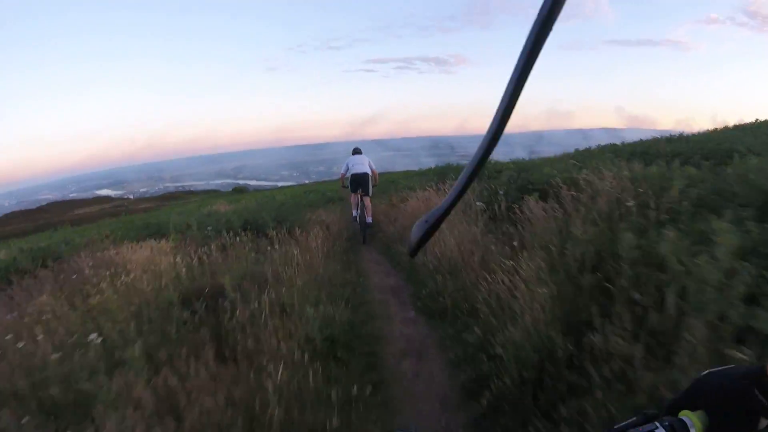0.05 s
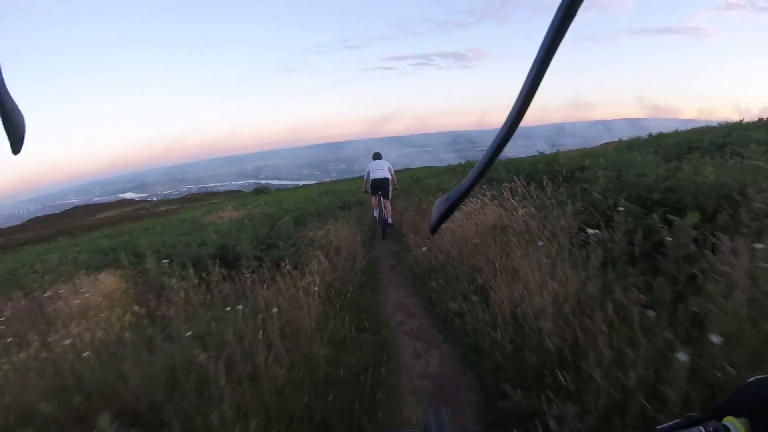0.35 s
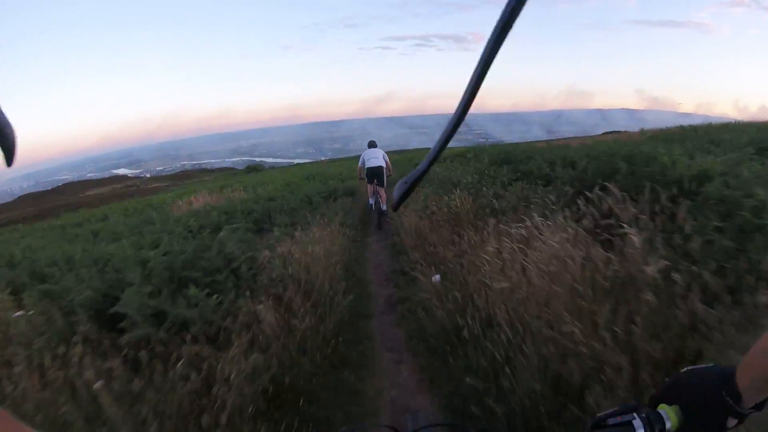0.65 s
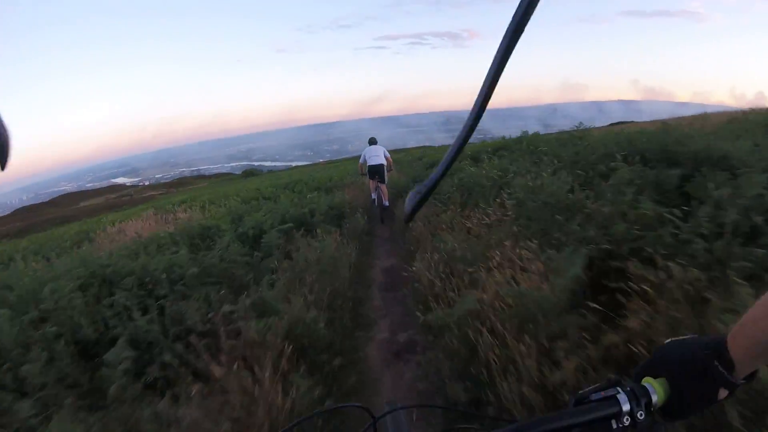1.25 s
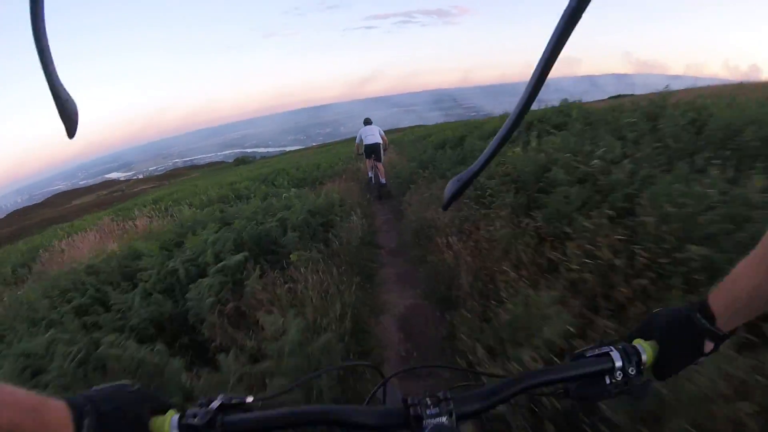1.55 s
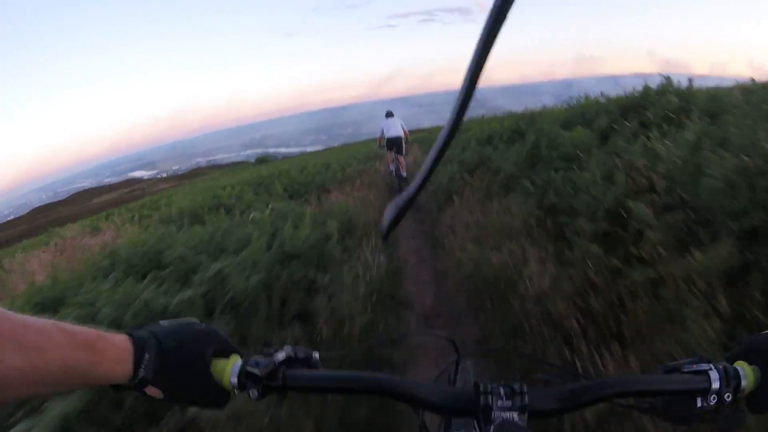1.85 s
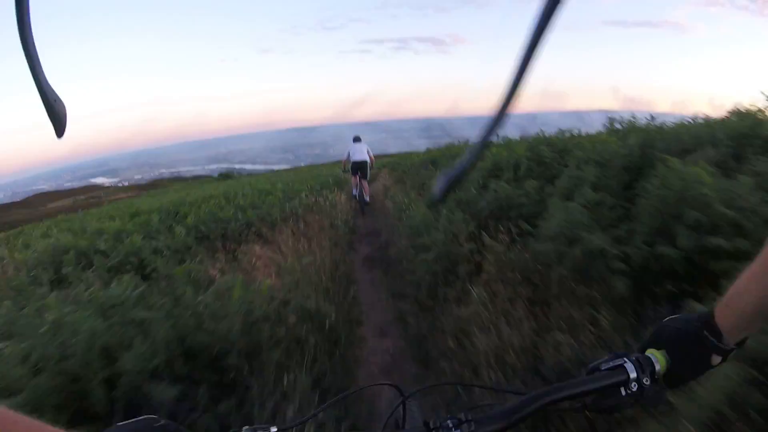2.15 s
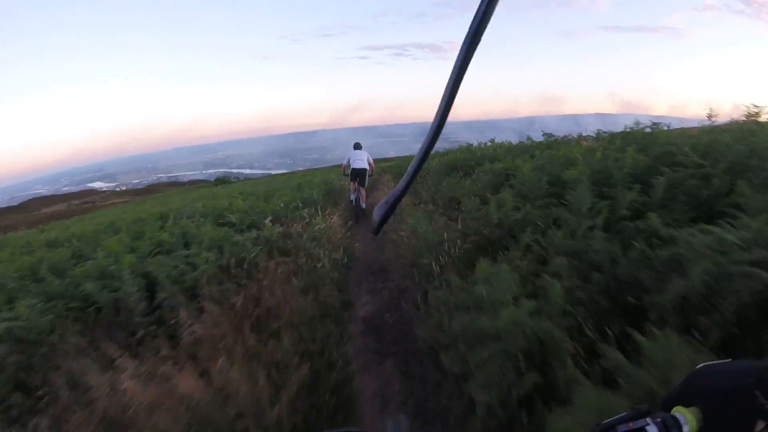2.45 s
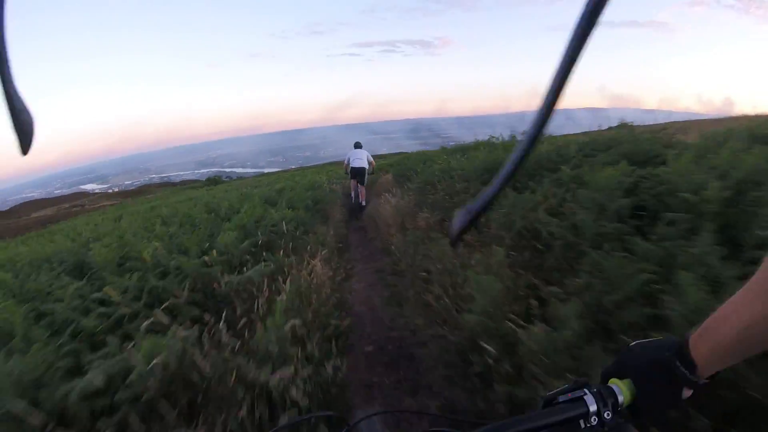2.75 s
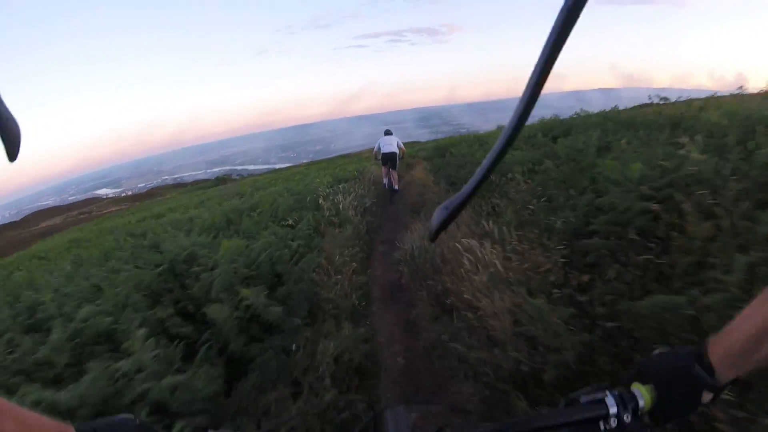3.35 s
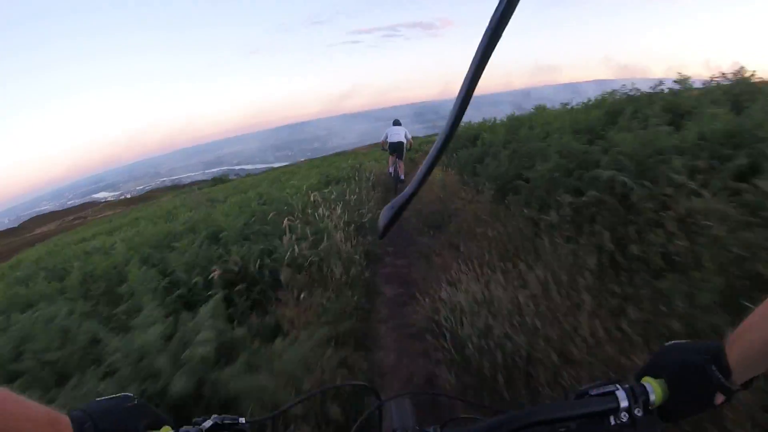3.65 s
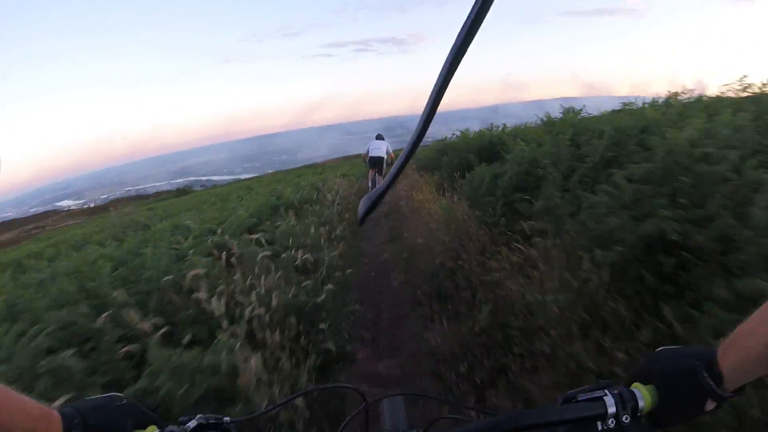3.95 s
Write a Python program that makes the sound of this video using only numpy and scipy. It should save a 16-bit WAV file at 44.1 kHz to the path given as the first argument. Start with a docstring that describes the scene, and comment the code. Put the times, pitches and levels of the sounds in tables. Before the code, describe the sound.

Gusts of wind buffet a microphone carried on a moving mountain bike. The chain rattles against the frame, most clearly just past halfway, while long grass brushes faintly by and the tyres crunch quietly on a dirt path.

```python
"""A dirt trail through long grass and bracken, heard from the rider of a rolling mountain bike.
Wind leads: gusts rumble on the microphone, and hard eddies thump and tear at its port.
Over bumps the chain knocks and rattles on the frame, ringing its modes, with one metallic clack.
Stems swish against the bike, a stiff one squeaks past, and the tyres crunch softly underneath."""
import sys
import numpy as np
from scipy import signal
from scipy.fft import rfft, irfft
from scipy.io import wavfile
from scipy.ndimage import uniform_filter1d

SR = 44100
rng = np.random.default_rng(int(sys.argv[2]) if len(sys.argv) > 2 else 0)


def int16_out(signal):
    """Quantize to a 16-bit WAV file."""
    q = np.round(np.clip(np.atleast_2d(signal).T, -1, 1) * 32767)
    wavfile.write(sys.argv[1], SR, q.astype(np.int16))


N = 176400
TIME = np.arange(N) / SR

# Steady wind between gusts: time_s, level_db
WIND_BED = [(0, -28.5), (.2, -26), (.53, -36.5), (.68, -24), (1.3, -35), (1.55, -36.5), (1.7, -32.5),
            (1.88, -20), (2.15, -30.5), (2.45, -34), (3.1, -29), (3.35, -33), (3.65, -28), (4, -23.5)]
# Gusts breaking on the microphone: centre_s, length_s, rumble_db, turbulence_db
WIND_GUSTS = [(.01, 0.037, -17.5, -28.5), (0.097, 0.026, -21, -26), (0.388, 0.074, -19, -26.5),
              (0.743, 0.034, -22, -27), (0.841, 0.049, -33, -25), (0.988, 0.036, -27, -30),
              (1.052, 0.035, -18, -33), (1.118, 0.014, -40, -25.5), (1.268, 0.16, -24, -38),
              (1.737, 0.0098, -32, -26.5), (1.861, 0.013, -35, -15.5), (1.909, 0.032, -27, -27),
              (1.98, 0.04, -23.5, -24), (2.082, 0.044, -20, -26.5), (2.145, 0.021, -25.5, -19),
              (2.247, 0.054, -17.5, -30), (2.57, 0.029, -21, -26), (2.682, 0.068, -19.5, -30.5),
              (3.094, 0.074, -24, -32.5), (3.227, 0.018, -18.5, -32), (3.464, 0.084, -20, -33),
              (3.639, 0.1, -21.5, -29.5), (3.729, 0.034, -19, -23.5), (3.773, 0.015, -10.5, -14),
              (3.832, 0.014, -20, -23.5), (3.918, 0.03, -27, -24)]
# EQ of the wind's low end: frequency_hz, gain_db
RUMBLE_EQ = [(15, -33.5), (25, -3), (38, 0.5), (75, 4.5), (115, 0.5), (185, -7.5), (400, -30.5), (880, -72)]
# EQ of the churning air above it: frequency_hz, gain_db
TURBULENCE_EQ = [(60, -19), (130, -4.5), (205, -0.5), (340, -8), (500, -12.5), (800, -22), (1300, -34),
                 (4000, -71.5)]
# Hard eddies striking the microphone: centre_s, level_db, half_width_s
HARD_EDDIES = [(0.154, -24, 0.001), (.384, -15.5, .0011), (0.402, -14, 0.0025), (0.427, -14, 0.001),
               (0.515, -16.5, 0.0028), (0.736, -14, 0.0024), (0.823, -31, 0.00055), (1.809, -18.5, 0.0006),
               (1.981, -12, 0.0019), (1.99, -19.5, 0.00055), (2.071, -18.5, 0.00066), (2.207, -13.5, 0.002),
               (2.404, -20.5, 0.0015), (2.691, -20, 0.00065), (3.005, -15, 0.0022), (3.137, -14, 0.0031),
               (3.441, -17.5, 0.0022), (3.653, -18, 0.0013), (3.772, -7.5, 0.0017), (3.775, -21.5, 0.00052),
               (3.809, -22, 0.00053), (3.719, -28, 0.00053), (3.961, -16.5, 0.0014)]
# Chain hits on the frame: start_s, peak_db
CHAIN_HITS = [(0.2567, -38), (0.607, -36), (0.6404, -33), (0.7102, -36.5), (0.7862, -39.5), (0.957, -35.5),
              (1.0903, -38.5), (1.3914, -39), (1.4413, -42), (1.4708, -42), (1.752, -34), (1.7993, -36.5),
              (1.9112, -33.5), (1.926, -32), (2.0469, -40), (2.2298, -31), (2.2723, -22), (2.308, -31),
              (2.3437, -37), (2.38, -35.5), (2.4151, -33), (2.4508, -33.5), (2.4894, -37.5), (2.5455, -36),
              (2.6312, -39), (2.7376, -38), (2.881, -35.5), (2.8973, -36), (3.1053, -30.5), (3.2303, -33),
              (3.38, -41.5), (3.431, -35.5), (3.5796, -29), (3.6292, -27), (3.667, -30.5), (3.7883, -33),
              (3.8617, -35), (3.906, -36.5)]
# Resonances of the frame: pitch_hz, bandwidth_hz, gain_db
FRAME_MODES = [(1260, 220, 8.5), (2013, 620, 16.5), (2590, 620, 1.5)]
# Resonances of the metallic clack: pitch_hz, bandwidth_hz, gain_db
CLACK_MODES = [(1900, 150, 10), (2570, 270, 1), (3260, 330, 1), (5150, 760, -1.5), (7200, 800, -6.5)]
# Grass brushing the bike: time_s, level_db
BRUSH_BED = [(0, -51.5), (.58, -53.5), (.72, -45.5), (.95, -47), (1.05, -51), (1.7, -56), (1.9, -45.5),
             (2.15, -48.5), (2.42, -44.5), (2.55, -49), (2.8, -52), (2.95, -46), (3.5, -49), (3.63, -43),
             (4, -51)]
# Tufts and stems swiping the bike: centre_s, length_s, level_db
TUFT_SWIPES = [(0.631, 0.033, -57.5), (1.767, 0.035, -51), (1.807, 0.034, -49.5), (1.904, 0.0084, -49),
               (2.055, 0.012, -48.5), (2.235, 0.037, -51), (2.358, 0.011, -47), (2.434, 0.022, -42.5),
               (3.195, 0.0061, -45.5), (3.845, 0.0061, -46.5)]
# Bright EQ of the grass, also on the edge of each chain hit: frequency_hz, gain_db
SWISH_EQ = [(1500, 2.5), (3000, -5), (3900, -5.5), (4500, -2.5), (5100, 4), (5600, -3.5), (6250, -2.5),
            (6520, 8), (6800, 0.5), (7800, -5), (10500, -27.5), (14000, -50)]
# Rolling level, ridden by both tyre crunch and chain rattle: time_s, level_db
ROLL_BED = [(0, -55), (.55, -57.5), (.8, -52), (1.6, -55.5), (2.4, -48.5), (2.7, -54), (3.15, -50),
            (4, -52)]
# EQ of tyres on dirt: frequency_hz, gain_db
DIRT_EQ = [(600, 4.5), (1300, 0.5), (1850, -1.5), (2600, -2), (3200, -3), (3900, -14), (5000, -8.5),
           (9000, -16), (13000, -52.5)]

RUMBLE_DB, TURBULENCE_DB, SPIT_DB, TEAR_DB = 1, -2.5, -16.5, -16  # wind trims
KNOCK_DB, RATTLE_DB, BRUSH_DB, SWIPE_DB, TYRE_DB = -3.5, -6.5, -5, 5, 3.5  # bike and grass trims
FLUTTER_HZ, FLUTTER_WIDTH_HZ = 542, 550
KNOCK_BAND = signal.butter(3, [600, 3500], "band", fs=SR, output="sos")


def wind(eddies_per_s=160, eddy_db=-4, calm_turbulence_db=-11):
    """Air breaks on the microphone: a steady bed plus gusts, each with rumble and puffs of turbulence."""
    rumble_power = level(WIND_BED) ** 2
    churn_power = rumble_power * amp(calm_turbulence_db) ** 2
    for centre_s, length_s, rumble_db, turbulence_db in WIND_GUSTS:
        gust = swell(centre_s, length_s)
        rumble_power += (gust * amp(rumble_db)) ** 2
        churn_power += (gust * amp(turbulence_db)) ** 2
    puffs = steadied(wobble(depth_db=3, rate_hz=63), samples=2500)
    rumble = steadied(colour(rng.standard_normal(N), RUMBLE_EQ), samples=1500) * np.sqrt(puffs)
    rumble *= steadied(wobble(depth_db=2.5, rate_hz=19), samples=SR // 8)  # pushes with dips between
    eddies = sum(signal.fftconvolve(clicks(eddies_per_s / 3, spread_db=5.5), eddy(half_width_s), "same")
                 for half_width_s in (.0008, .0012, .002))
    rush = unit(colour(rng.standard_normal(N), TURBULENCE_EQ))
    churn = steadied(rush + amp(eddy_db) * unit(eddies), samples=1500)
    force = np.sqrt(churn_power) * puffs
    spit = force * unit(force) ** -0.06 * port_flutter(FLUTTER_HZ)  # follows the force, lightly compressed
    return (amp(RUMBLE_DB) * np.sqrt(rumble_power) * rumble
            + amp(TURBULENCE_DB) * force * churn + amp(SPIT_DB) * spit)


def buffets(reference_half_width_s=.0008, reference_hz=580):
    """Each hard eddy lands a dull thump and tears at the port; tighter ones tear louder and higher."""
    out = np.zeros(N)
    for centre_s, level_db, half_width_s in HARD_EDDIES:
        thump = eddy(half_width_s)
        add(out, centre_s - len(thump) / 2 / SR, -amp(level_db) * thump)
        tightness = reference_half_width_s / half_width_s
        tear = swell(centre_s, length_s=0.005) * port_flutter(reference_hz * tightness)
        out += amp(level_db + TEAR_DB) * tightness ** 2 * tear
    return out


def eddy(half_width_s):
    """The down-and-up pressure swing of a vortex passing the microphone."""
    position = np.arange(-SR // 40, SR // 40) / SR / half_width_s
    return unit(np.hanning(len(position))) * 2 * position / (1 + position ** 2) ** 2


def port_flutter(centre_hz):
    """Hollow noise of air tearing at the microphone port, transposed to a centre pitch."""
    hz = np.fft.rfftfreq(N, 1 / SR) * FLUTTER_HZ / centre_hz
    low_cut = 1 - np.exp(-(hz / 300) ** 2)
    hump = 1 / (1 + abs(2 * (hz - FLUTTER_HZ) / FLUTTER_WIDTH_HZ) ** 3)
    return unit(irfft(rfft(rng.standard_normal(N)) * low_cut * hump, N))


def chain_knocks(detune=0.039, edge_db=-14.5):
    """Dry knocks with a bright edge; each lands on another spot of the frame, so the tuning shifts."""
    out = np.zeros(N)
    for start_s, peak_db in CHAIN_HITS:
        modes = [(hz * (1 + detune * rng.standard_normal()), width, db) for hz, width, db in FRAME_MODES]
        body = peaked(signal.sosfilt(KNOCK_BAND, ring(scuff(), modes)))
        edge = peaked(colour(scuff(), SWISH_EQ))
        add(out, start_s, amp(peak_db + KNOCK_DB) * (body + amp(edge_db) * edge))
    return out


def chain_rattle():
    """Light random taps of the chain ring the frame between the knocks."""
    taps = signal.fftconvolve(abs(clicks(per_s=18, spread_db=1)), abs(scuff()))[:N]
    frame = ring(taps * rng.standard_normal(N), FRAME_MODES)
    return amp(RATTLE_DB) * level(ROLL_BED) * unit(signal.sosfilt(KNOCK_BAND, frame))


def clack(peak_db=-30):
    """One sharp contact sets metal ringing briefly."""
    band = signal.butter(6, [1400, 10800], "band", fs=SR, output="sos")
    metal = ring(scuff(rise_s=0.00073, decay_s=0.0028), CLACK_MODES)
    return amp(peak_db) * peaked(signal.sosfilt(band, metal))


def grass():
    """Blades brush the bike throughout, four bands flickering on their own; tufts swipe it in swells."""
    blades = unit(clicks(per_s=700, spread_db=3)) + .5 * rng.standard_normal(N)
    spectrum = rfft(colour(blades, SWISH_EQ))
    band_of_bin = np.searchsorted([4000, 5900, 7200], np.fft.rfftfreq(N, 1 / SR))
    rustle = unit(sum(irfft(spectrum * (band_of_bin == band), N) * wobble(depth_db=2.53, rate_hz=28)
                      for band in range(4)))
    flicker = steadied(wobble(depth_db=0.78, rate_hz=84), samples=3000)
    brush_power = (level(BRUSH_BED) * amp(BRUSH_DB) * flicker) ** 2
    swipe_power = sum((amp(level_db + SWIPE_DB) * swell(centre_s, length_s)) ** 2
                      for centre_s, length_s, level_db in TUFT_SWIPES)
    return np.sqrt(brush_power + swipe_power) * rustle


def stem_squeak(pitch_hz=5750, bandwidth_hz=200, peak_db=-46):
    """A stiff stem scrapes past and rings one high, narrow mode."""
    return amp(peak_db) * peaked(ring(scuff(), [(pitch_hz, bandwidth_hz, 0)]))


def tyres():
    """Grit crushed under the tread: tiny clicks in a soft, uneven wash of noise."""
    grit = unit(clicks(per_s=1200, spread_db=4)) + 1.74 * rng.standard_normal(N)
    unevenness = steadied(wobble(depth_db=2, rate_hz=18), samples=4000)
    return amp(TYRE_DB) * level(ROLL_BED) * unit(colour(grit * unevenness, DIRT_EQ))


def scuff(rise_s=0.0016, decay_s=0.0033):
    """A brief rough contact: noise with a fast attack and an exponential tail."""
    t = np.arange(SR // 10) / SR
    attack = np.minimum(t / rise_s, 1)
    tail = np.exp(-np.maximum(t - rise_s, 0) / decay_s)
    return rng.standard_normal(len(t)) * attack * tail


def ring(x, modes):
    """Drives a set of damped modes; the wider ones die sooner."""
    t = np.arange(SR // 10) / SR
    body = sum(amp(db) * np.sqrt(width) * np.exp(-np.pi * width * t) * np.cos(2 * np.pi * hz * t)
               for hz, width, db in modes)
    return signal.fftconvolve(x, body)[:len(x)]


def clicks(per_s, spread_db):
    """Random impulses of uneven size."""
    size = amp(spread_db * np.minimum(rng.exponential(1, N), 4))
    return size * rng.choice([-1, 1], N) * (rng.random(N) < per_s / SR)


def colour(x, eq):
    """Minimum-phase EQ, so attacks get no pre-ring."""
    points_hz, points_db = np.transpose(eq)
    hz = abs(np.fft.fftfreq(16384, 1 / SR))
    log_gain = np.log(amp(np.interp(np.log(hz + 1), np.log(points_hz + 1), points_db)))
    taps = np.fft.ifft(np.exp(np.conj(signal.hilbert(log_gain)))).real[:4096]
    return signal.fftconvolve(x, taps)[:len(x)]


def wobble(depth_db, rate_hz):
    """A randomly wandering gain: depth_db rms, moving at up to about rate_hz."""
    hz = np.fft.rfftfreq(N, 1 / SR)
    drift = rfft(rng.standard_normal(N)) * np.exp(-(hz / rate_hz) ** 2) * (1 - np.exp(-hz / 10))
    return amp(depth_db * unit(irfft(drift, N)))


def swell(centre_s, length_s):
    """Bell-shaped fade up and down."""
    return np.exp(-np.minimum((2 * (TIME - centre_s) / length_s) ** 2, 100) / 2)


def level(curve):
    """Fader ride through time_s, level_db points."""
    times_s, levels_db = np.transpose(curve)
    return amp(np.interp(TIME, times_s, levels_db))


def steadied(x, samples):
    """Leveller: evens out changes slower than its window."""
    return x / np.sqrt(uniform_filter1d(uniform_filter1d(x ** 2, samples), samples))


def peaked(x):
    """Scales the loudest 2 ms to rms 1."""
    return x / np.sqrt(uniform_filter1d(x ** 2, size=88).max())


def unit(x):
    """Scales to rms 1."""
    return x / np.sqrt(np.mean(x ** 2) + 1e-20)


def amp(db):
    """Decibels to gain."""
    return 10 ** (np.asarray(db) / 20)


def add(mix, start_s, sound):
    """Drops a sound into the mix at its cue."""
    part = mix[max(round(start_s * SR), 0):][:len(sound)]
    part += sound[:len(part)]


def scene():
    """The mono mix at the rider's microphone."""
    mix = wind() + buffets() + tyres() + grass()
    add(mix, start_s=1.057, sound=stem_squeak())
    mix += chain_rattle() + chain_knocks()
    add(mix, start_s=.5702, sound=clack())
    return mix[None]


def record(dry, low_cut_hz=20, hiss_db=-70.5, high_cut_hz=13300):
    """The microphone's bass roll-off, faint hiss and band limit."""
    low_cut = signal.butter(2, low_cut_hz, "high", fs=SR, output="sos")
    high_cut = signal.firwin(201, high_cut_hz, window=("kaiser", 9), fs=SR)
    mic = signal.sosfilt(low_cut, dry) + amp(hiss_db) * rng.standard_normal(N)
    return signal.oaconvolve(mic, high_cut[None], "same")


dry = scene()
out = record(dry)
int16_out(out)
```